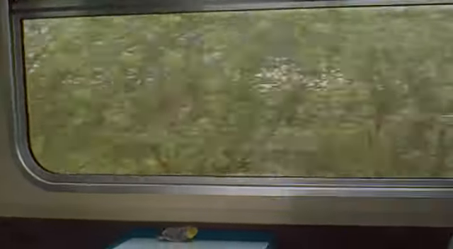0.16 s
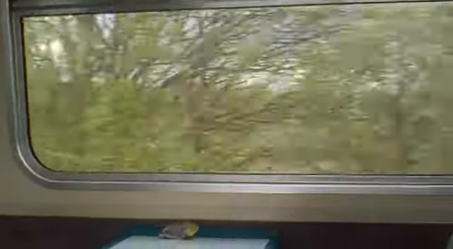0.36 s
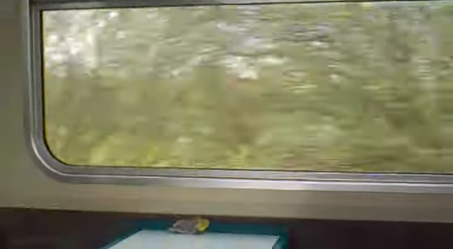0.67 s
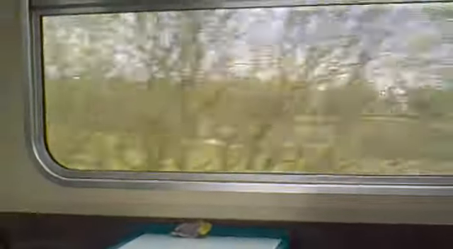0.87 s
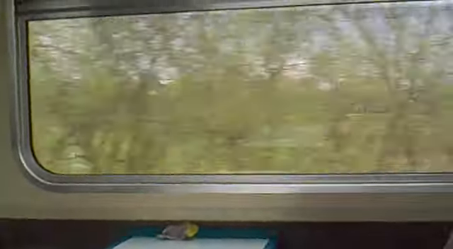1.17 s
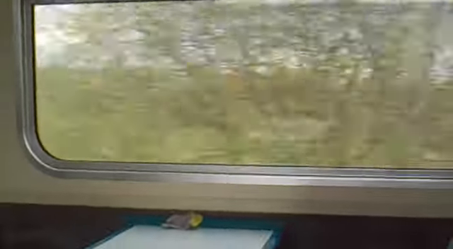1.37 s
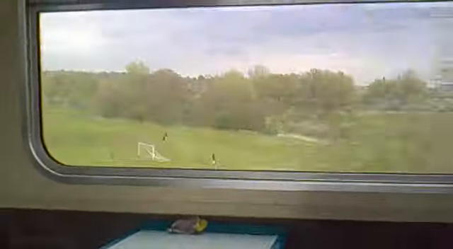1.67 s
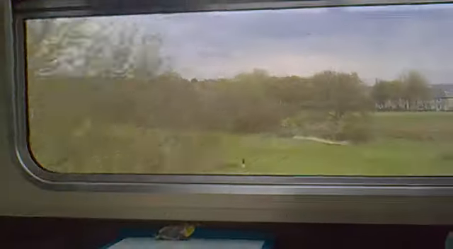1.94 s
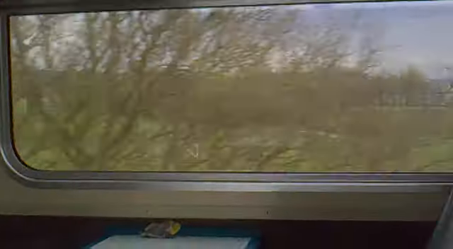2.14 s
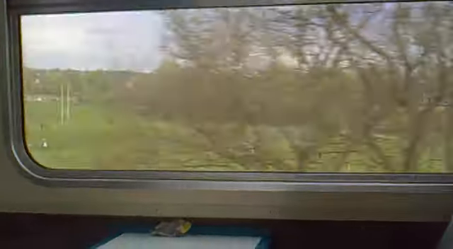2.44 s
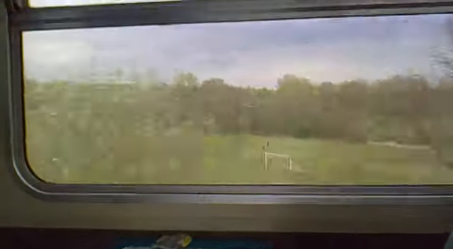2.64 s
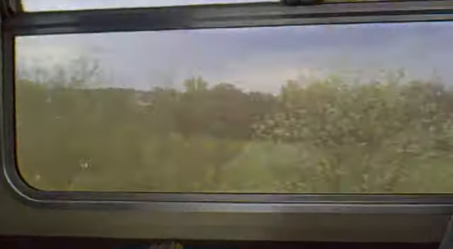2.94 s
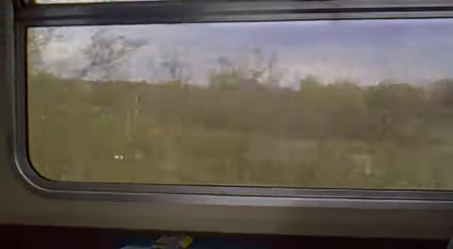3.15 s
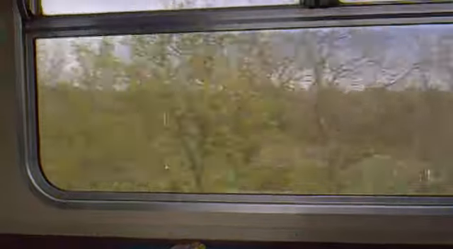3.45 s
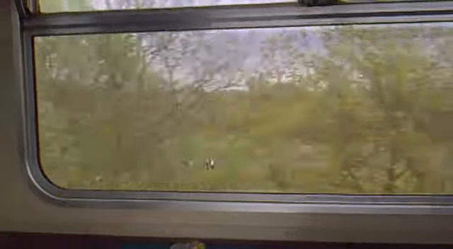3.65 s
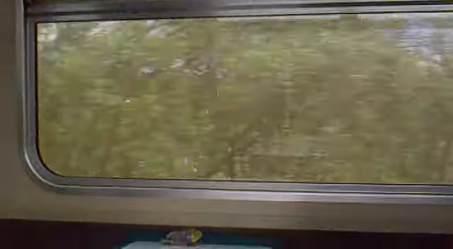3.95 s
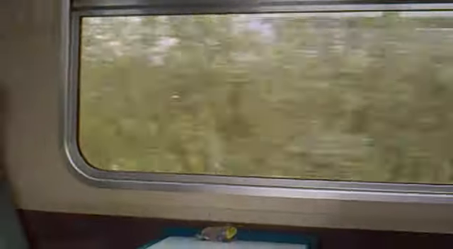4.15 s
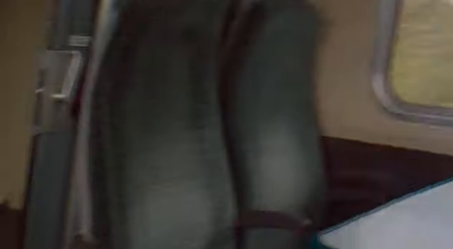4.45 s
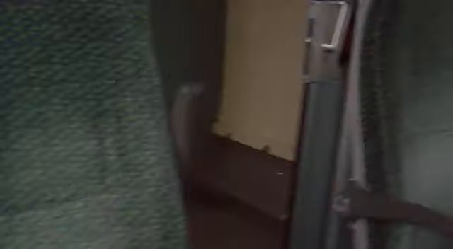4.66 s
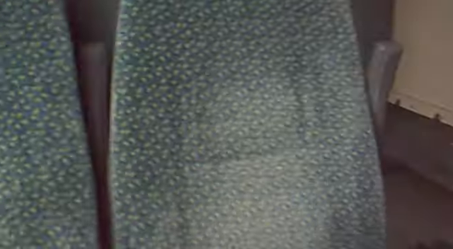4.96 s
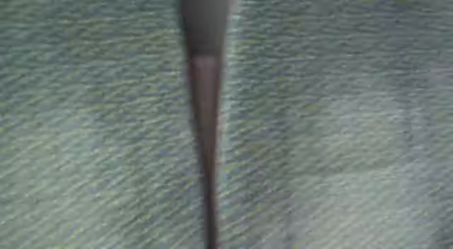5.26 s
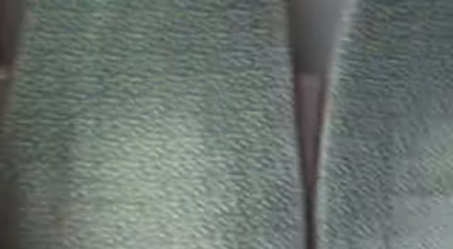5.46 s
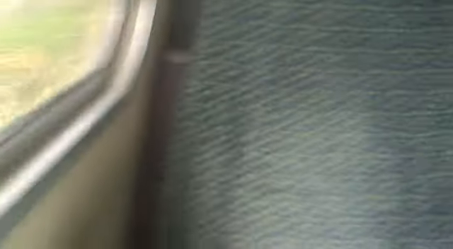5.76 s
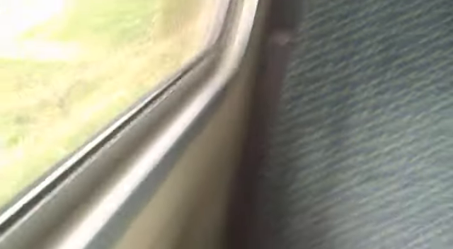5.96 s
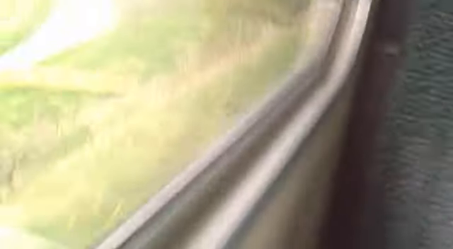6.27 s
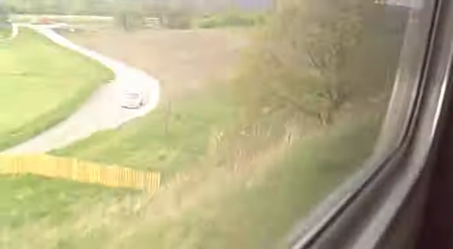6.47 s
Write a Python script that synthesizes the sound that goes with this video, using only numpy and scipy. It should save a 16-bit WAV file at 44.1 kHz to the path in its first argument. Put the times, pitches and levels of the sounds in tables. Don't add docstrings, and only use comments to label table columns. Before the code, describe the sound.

Heard from a coach seat, wheels thud and clank in groups across jointed track while windows roar, air hums and a hand ticks the camera.

```python
import sys
import numpy as np
from scipy import signal
from scipy.fft import rfft, irfft, next_fast_len
from scipy.io import wavfile
from scipy.ndimage import uniform_filter1d, map_coordinates

SR = 44100
rng = np.random.default_rng(int(sys.argv[2]) if len(sys.argv) > 2 else 0)


def materialize(psi):
    bounded = np.clip(np.atleast_2d(psi).T, -1, 1)
    quanta = np.round(bounded * 32767).astype(np.int16)
    wavfile.write(sys.argv[1], SR, quanta)


def rack_gain(trim_db):
    fader = np.asarray(trim_db, float)
    return 10 ** (fader / 20)


N = 291942

# [t/s, rail roughness/dB, nearness to the panes/dB, place in the cabin's standing wave/dB]
RIDE = [(0, 9.5, -1.5, 4.5), (.4, -2.5, -1, -6), (.8, 3.5, 3.5, 7.5), (1.3, -2, -3, -6.5),
        (1.7, 3.5, -1, 0.5), (2.2, 1, -1, 0), (2.7, 3, 2, 1), (3.05, 1.5, -3, 2.5), (3.5, 7, -0.5, 6),
        (3.95, 5, 3.5, 5.5), (4.4, -0.5, 2, 3), (4.8, 2.5, 1.5, 2), (5.3, 0, 4, -1), (5.65, 1.6, 5, 2),
        (5.9, 6, 8.5, 4.5), (6.25, 4.5, 3.5, -2.5), (6.36, 3, 7, 8), (6.62, 5.5, 10, 7.5)]
# [f/Hz, width/Hz, level/dB]
CABIN_AIR = [(377.9, 45, 2.5), (430.7, 60, -1), (469, 45, -10)]
# [f/Hz, width/Hz, level/dB]
PANES = [(140, 89, 12), (742, 134, 7), (843, 66, 11), (1250, 220, -3), (2130, 300, -32.5)]
# [f/Hz, level per Hz/dB]
HISS_COLOUR = [(40, -27), (60, 4.5), (103, -23), (230, -14), (500, -17.5), (1000, -18), (2300, -21.5),
               (3300, -31.5), (5000, -39.5), (6500, -44), (7500, -53.5), (10000, -57), (13000, -60),
               (16000, -55)]
# [t/s, peak level/dB]
LURCHES = [(0, -29), (.68, -27.5), (.83, -23), (.95, -38), (1.43, -30), (1.53, -31), (1.64, -21.5),
           (1.79, -28.5), (1.919, -30.5), (2.36, -38), (2.52, -23.5), (2.67, -33), (2.82, -39),
           (3.24, -30.5), (3.36, -26.5), (3.49, -30), (4, -38), (4.1, -38), (4.2, -22.5), (4.3, -34),
           (4.53, -56), (4.62, -45), (4.96, -26.5), (5.1, -22), (5.24, -39), (5.55, -32), (5.99, -27),
           (6.14, -39), (6.36, -35), (6.46, -33)]
# [f/Hz, level per Hz/dB]
RUMBLE_COLOUR = [(7.1, -25), (12, -1), (27, 10.5), (37, 5.5), (97, -11.5), (113, -26.5), (130, -9.5),
                 (170, -35), (290, -120)]
# [t/s, clank peak level/dB, boom over clank/dB, time to fade 60 dB/s]
JOINTS = [(0.0094, -34.5, 2, 0.19), (0.0902, -61, -3, .33), (0.4698, -43.5, -10, 0.46),
          (0.5314, -24, 0, 0.24), (0.639, -22.5, 2.5, 0.37), (0.758, -14.5, 5.5, .22),
          (0.8502, -36.5, -8, 0.97), (1.3875, -29, 2.2, 0.52), (1.4974, -26.5, 2.5, 0.37),
          (1.6148, -19.5, 5.5, .19), (1.7114, -37.5, -5, 0.9), (1.8638, -44.5, -1, 0.89),
          (2.2506, -29.5, 1.5, 0.37), (2.3335, -18.5, -1.5, 0.2), (2.4503, -12, 0.7, 0.2),
          (3.0874, -26.5, -3, 0.35), (3.212, -29, 0.8, 0.38), (3.411, -38, 0.5, 0.67),
          (3.4986, -37.5, -5, 0.25), (3.9988, -39.5, 3, 0.42), (4.066, -20.5, 2, 0.29),
          (4.19, -17, 6.5, 0.23), (4.8285, -25.5, -3.5, 0.39), (4.9383, -21, 0, 0.42),
          (5.062, -14, 0.5, 0.23), (5.7119, -32.5, 5, 0.52), (5.827, -36, 1, 0.81),
          (5.9438, -25.5, 6, 0.14), (6.14, -42, 4.5, 0.27), (6.3242, -48.5, 17.5, 0.15)]
# [f/Hz, width/Hz, lift/dB]
STEEL = [(700, 14, 7.5), (886, 65, -3.5), (1226, 53, -0.5), (1580, 190, -4), (1910, 13, -4), (2195, 52, -8),
         (2140, 12, 7), (2350, 46, -6.5), (2770, 67, -0.5), (3650, 250, -6.5), (4370, 21, -22),
         (4880, 39, -5)]
# [f/Hz, width/Hz, level/dB]
FLOOR = [(160.3, 9.7, -3), (194.7, 38, -2.5), (254.7, 7.4, -14.5), (383.7, 24, -6.5), (464.6, 17.6, -3),
         (700, 210, -11)]
# [f/Hz, level per Hz/dB]
CLANK_COLOUR = [(300, -30), (600, -5), (900, -14), (1400, -13), (2300, -13.5), (3200, -23.5), (4500, -28.5),
                (6200, -33), (7800, -45), (9000, -48.5), (11500, -53), (14000, -65), (15800, -75)]
# [f/Hz, level per Hz/dB]
THUD_COLOUR = [(50, -35), (90, -14.5), (140, 5), (200, -8.5), (280, 1.5), (450, -4.5), (700, -13.5),
               (1100, -13.5), (2000, -62)]
# [t/s, panel peak level/dB, panel f/Hz, wheel over panel/dB, wheel f/Hz]
RINGS = [(0.533, -20.5, 550, -4.5, 2060), (0.651, -17, 140, -15, 2240), (0.76, -10.5, 304.5, -23, 2360),
         (1.392, -27, 437, -3.5, 2370), (1.502, -23, 275, -10, 2320), (1.615, -7.5, 268, -23, 2130),
         (2.333, -17, 290, -18, 2200), (2.454, -5, 254, -12.5, 2390), (3.084, -33, 700, 3, 2226),
         (3.214, -30, 393, -1.5, 2080), (4.074, -20.5, 389, -6, 2630), (4.193, -20, 150, -31, 2270),
         (4.832, -27.5, 418, -2, 2116), (4.955, -11.5, 145.7, -15, 2460), (5.065, -21, 284, -28, 2300),
         (5.712, -23, 160, -12, 2430), (5.943, -26, 213, -27, 1990), (6.326, -29, 409, -26, 2290)]
# [t/s, peak
# level/dB, f/Hz, time to fade 60 dB/s]
LOW_KNOCKS = [(0.7604, 3, 322, 0.022), (1.618, 5, 332, 0.03), (1.424, -11, 440, 0.068),
              (5.945, -11, 300, 0.02), (6.44, -18, 150, 0.08), (0.7755, 0, 480, 0.025),
              (0.796, -5, 301, 0.016), (1.637, 6, 266, 0.029), (2.472, -4, 274, 0.028),
              (2.487, -10, 250, 0.016), (4.196, -4, 258, 0.057), (4.221, 1, 272, 0.056),
              (5.081, -0.5, 300, 0.02), (5.985, -28, 315, 0.02)]
# [t/s, peak level/dB, then over the peak: knock/dB, snap/dB, edge/dB]
TICKS = [
    (3.887, -38, 7, -23, -24),
    (3.91, -26, 0, -28, -22),
    (4.027, -41, -6, -25, -35),
    (4.0815, -11.5, 7, -39, -11),
    (4.1516, -14, -10, -26, -22),
    (4.3567, -38.5, 18.5, -21, -34),
    (4.757, -49, 0, -1, -25),
]
# [f/Hz, width/Hz]
SHELL = [(2350, 1730), (4100, 3200), (7300, 1400), (14000, 4800)]

HUM_DB, ROAR_DB, HISS_DB = -53.5, -49.5, -50.5
SHAKE_LEAD_S, SHAKE_TAIL_S = 0.067, 0.15
HUM_SHAKE_DB, HISS_SHAKE_DB = 23.5, 17
TREBLE_DB, MUFFLE = 2.5, 0.59
IDLE_DB, SWELL_DB_PER_S, SINK_DB_PER_S = -43, 284, 223
BOOMY_RISE_S, STEELY_RISE_S = 0.00516, 0.0026
BRIGHT_DB = 2.5
TREBLE_LAG_S = 0.006
PANEL_T60_S, WHEEL_T60_S = 0.13, 0.14
TOP_HZ = 15830


def unit(x):
    return x / np.sqrt(np.mean(x ** 2) + 1e-20)


def along(points, hz):
    f, value = np.transpose(points)
    return np.interp(np.log(hz + 1), np.log(f + 1), value)


def curves(rows):
    s, *columns = np.transpose(rows)
    return [np.interp(np.arange(N) / SR, s, column) for column in columns]


def wobble(rate):
    knots = rng.standard_normal(int(N * rate / SR) + 4)
    return map_coordinates(knots, [np.arange(N) * rate / SR])


def filtered(x, response):
    size = next_fast_len(len(x) + SR // 4)
    spectrum = rfft(x, size) * response(np.fft.rfftfreq(size, 1 / SR))
    return irfft(spectrum, size)[:len(x)]


def modes(table, f):
    total = 0
    for k, (centre, width, db) in enumerate(table):
        total = total + (-1) ** k * rack_gain(db) * 1j * f * width / (centre ** 2 - f ** 2 + 1j * f * width)
    return total


def highpass(x, hz):
    return filtered(x, lambda f: 1 / (1 + (hz / (f + 1)) ** 4))


def noise(size, gain):
    return unit(filtered(rng.standard_normal(size), gain))


def patchy(gain, patchy_db):
    z = signal.stft(rng.standard_normal(N + SR), nperseg=512)[2]
    field = uniform_filter1d(rng.standard_normal(z.shape), 5, 0)
    field = unit(uniform_filter1d(field, 10, 1))
    patches = signal.istft(z * rack_gain(patchy_db * field), nperseg=512)[1][:N]
    return unit(filtered(patches, gain))


def steadied(x, span, share):
    swell = np.sqrt(np.abs(uniform_filter1d(x ** 2, round(span * SR))) + .02)
    return unit(x / swell ** share)


def add(track, s, sound):
    part = track[max(round(s * SR), 0):][:len(sound)]
    part += sound[:len(part)]


def shaking():
    t, power = np.arange(0, N, 64) / SR, 0
    for s, db, *_ in JOINTS:
        slope = np.where(t < s, (t - s) / SHAKE_LEAD_S, (s - t) / SHAKE_TAIL_S)
        power = power + rack_gain(2 * db) * np.exp(2 * slope)
    return np.interp(np.arange(N) / SR, t, np.sqrt(power))


def rolling():
    rough_db, near_db, place_db = curves(RIDE)
    shake = shaking()
    hum = 0
    for mode in CABIN_AIR:
        tone = steadied(noise(N, lambda f: modes([(*mode,)], f) ** 2), span=.12, share=0.28)
        hum = hum + rack_gain(mode[2] + 2.2 * wobble(8.2)) * tone
    hum = rack_gain(HUM_DB + place_db) * (1 + rack_gain(HUM_SHAKE_DB) * shake) * hum
    roar = rack_gain(ROAR_DB + near_db) * patchy(lambda f: modes(PANES, f), patchy_db=2.2)
    hiss = patchy(lambda f: rack_gain(along(HISS_COLOUR, f)), patchy_db=-1.35)
    hiss = hiss + (rack_gain(TREBLE_DB - MUFFLE * near_db) - 1) * highpass(hiss, 3500)
    hiss = rack_gain(HISS_DB + rough_db + 0.61 * wobble(14)) * (1 + rack_gain(HISS_SHAKE_DB) * shake) * hiss
    return hum + roar + hiss


def body():
    t = np.arange(0, N, 64) / SR
    heave = rack_gain(IDLE_DB)
    for s, db in LURCHES:
        slope_db = np.where(t < s, (t - s) * SWELL_DB_PER_S, (s - t) * SINK_DB_PER_S)
        heave = heave + rack_gain(db + slope_db)
    rumble = steadied(noise(N, lambda f: rack_gain(along(RUMBLE_COLOUR, f))), span=0.029, share=0.51)
    return np.interp(np.arange(N) / SR, t, heave) * rumble


def joints():
    out, t = np.zeros(N), np.arange(SR // 2) / SR
    for s, db, boom_db, t60 in JOINTS:
        rise = STEELY_RISE_S if boom_db < 0 else BOOMY_RISE_S

        knots = rng.standard_normal((2, 200))
        chatter = rack_gain(1.33 * map_coordinates(knots, [[0 * t, 1 + 0 * t], [t * 160, t * 60]]))
        tail = rack_gain(-14.0 - 60 * t / 0.8)
        fade = (1 - np.exp(-t / rise)) * (chatter * rack_gain(-60 * (t / t60) ** 1.237) + tail)

        struck = [(hz, width, lift_db + rng.normal(0, 3)) for hz, width, lift_db in STEEL]
        colour = lambda f: rack_gain(along(CLANK_COLOUR, f) + BRIGHT_DB * np.log2(f / 2000 + 0.25))
        hiss = noise(len(t), lambda f: colour(f) * (1 + np.abs(modes(struck, f))))
        crack = 0.39 * rack_gain(-60 * t / 0.0075) * (1 - np.exp(-t / .0008))
        clank = (fade[0] + crack) * (hiss - highpass(hiss, 5000) * np.exp(-t / TREBLE_LAG_S))

        thud = fade[1] * noise(len(t), lambda f: rack_gain(along(THUD_COLOUR, f)))
        hits = rng.standard_normal(len(t)) * (rng.random(len(t)) < 220 / SR) * rack_gain(-60 * t / (1.6 * t60))
        hits[round(rise * SR / 2)] = 0.52
        boom = filtered(hits, lambda f: modes(FLOOR, f) / (1 + 1j * f / 900))
        boom = boom / np.abs(boom).max()
        add(out, s, rack_gain(db - 8.0) * clank + rack_gain(db + boom_db) * (rack_gain(-8.5) * thud + rack_gain(-5.5) * boom))
    return out


def rings():
    out, t = np.zeros(N), np.arange(SR // 3) / SR
    for s, db, panel_hz, wheel_db, wheel_hz in RINGS:
        drift = np.cumsum(rng.standard_normal((2, len(t))), axis=1) * [[.012], [.045]]
        panel = np.sin(2 * np.pi * panel_hz * t + drift[0])
        panel = panel * rack_gain(-60 * t / PANEL_T60_S) * (1 - np.exp(-t / 0.0016))
        wheel = np.sin(2 * np.pi * wheel_hz * t + drift[1])
        wheel = wheel * rack_gain(-60 * t / WHEEL_T60_S) * (1 - np.exp(-t / 0.0023))
        add(out, s, rack_gain(db - 5) * (panel + rack_gain(wheel_db) * wheel))
    return out


def knocks():
    out, t = np.zeros(N), np.arange(SR // 10) / SR
    for s, db, hz, t60 in LOW_KNOCKS:
        add(out, s, rack_gain(db - 15.5) * np.sin(2 * np.pi * hz * t) * rack_gain(-60 * t / t60))
    return out


def ticks():
    out, t = np.zeros(N), np.arange(SR // 40) / SR
    for s, db, knock_db, snap_db, edge_db in TICKS:
        contact = .04 * rng.standard_normal(len(t)) * rack_gain(-60 * t / .01)
        contact[0] = 1
        contact[round(.0012 * SR)] = 0.33
        for (hz, width), level_db in zip(SHELL, [knock_db, -1.5, snap_db, edge_db + 7]):
            ring = filtered(contact, lambda f: modes([(hz, width, 0)], f) ** 2)
            add(out, s, rack_gain(db + level_db) * ring / np.abs(ring).max())
    return filtered(out, lambda f: np.clip((16950 - f) / 700, 0, 1))


def scene():
    train = rolling() + body() + joints() + rings() + knocks()
    air = rack_gain(-85) * rng.standard_normal(N)
    steady = filtered(train + air, lambda f: f < TOP_HZ)
    return (steady + ticks())[None]


def top_cut(x):
    return signal.sosfilt(signal.butter(12, 16990, fs=SR, output="sos"), x)


def record(dry):
    return top_cut(dry)


dry = scene()
out = record(dry)
materialize(out)
```